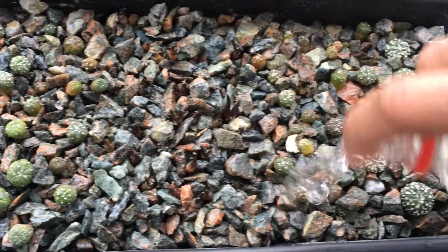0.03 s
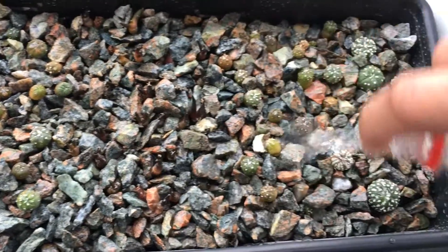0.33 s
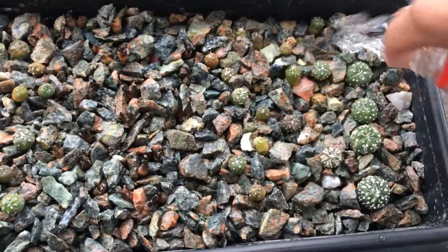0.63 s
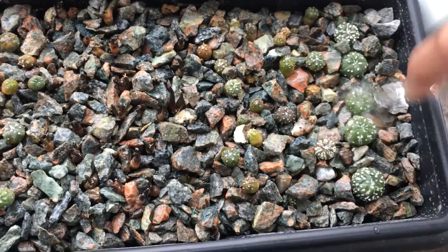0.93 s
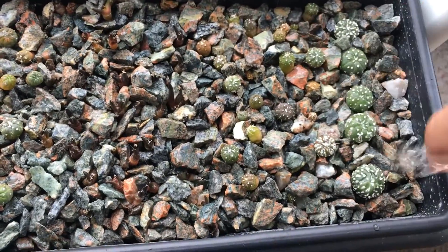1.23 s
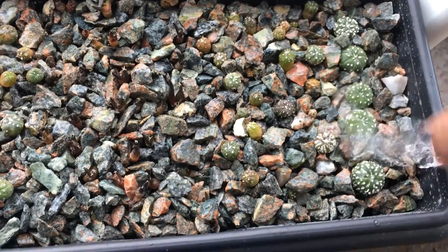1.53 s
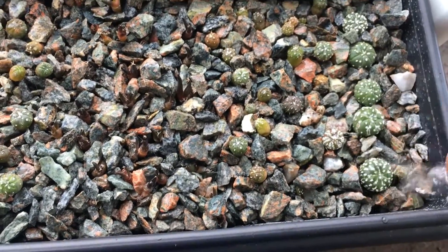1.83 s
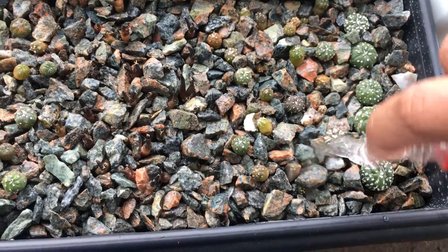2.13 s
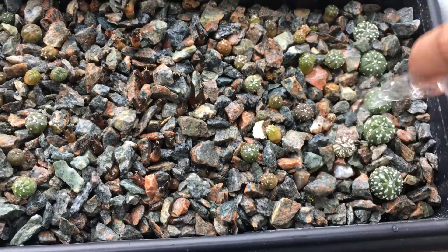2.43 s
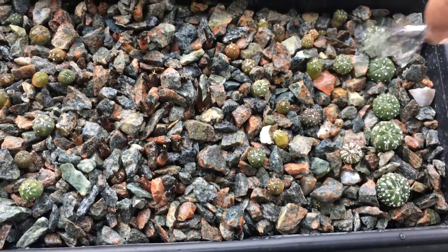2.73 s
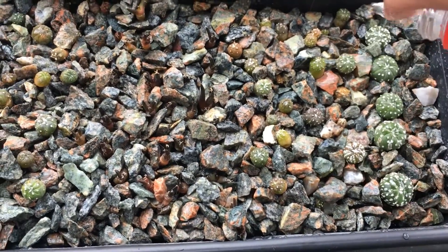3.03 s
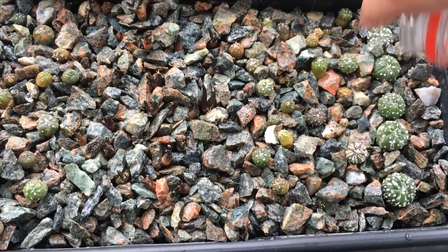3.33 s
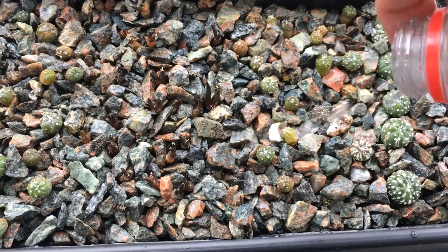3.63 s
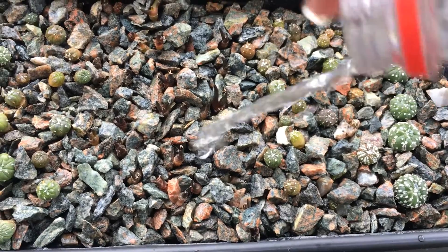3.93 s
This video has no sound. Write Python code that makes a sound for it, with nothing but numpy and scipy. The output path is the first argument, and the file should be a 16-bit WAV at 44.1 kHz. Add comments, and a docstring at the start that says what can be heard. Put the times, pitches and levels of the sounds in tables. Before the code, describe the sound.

Water sprinkles and ticks on small stones while a plastic bottle gulps softly.

```python
"""Water shaken from a plastic bottle onto gravel and small cacti in a tray; one close mic, a quiet room.
A first splash crackles over the room's low rumble, the bottle gulps, and a thin ring lingers.
For two seconds more the bottle thumps softly as air enters, while drops tick on the stones and splat
into wet gaps, trapped bubbles plink and fine patter follows the flow. Then the gulps stop and the
patter thins; drops keep falling, with a last small flurry just before the end."""
import sys
import numpy as np
from scipy import signal
from scipy.io import wavfile
from scipy.ndimage import uniform_filter1d

SR = 44100
rng = np.random.default_rng(int(sys.argv[2]) if len(sys.argv) > 2 else 0)


def store_wav(level_fs):
    """Save 16-bit WAV to argv[1]."""
    pcm = np.round(np.clip(np.atleast_2d(level_fs), -1, 1) * 32767)
    wavfile.write(sys.argv[1], SR, pcm.T.astype(np.int16))


N = 176400  # 4 s

# spectrum of water striking stone, for ticks and fizz (frequency [Hz], gain [dB])
IMPACT_SPECTRUM = [(300, 10), (900, -3.5), (2000, 4.5), (4000, 5), (8000, 5.5), (11000, 6), (16000, -1.5)]
CHIRP_PER_S = 20  # a drop's ring climbs by this many times its starting pitch per second


def amp(db):
    """Decibels to gain."""
    return 10 ** (np.asarray(db) / 20)


def unit(x):
    """Scales to rms 1."""
    return x / np.sqrt(np.mean(x ** 2) + 1e-20)


def seconds(size):
    """Time axis of size samples."""
    return np.arange(size) / SR


def read(points, hz):
    """Reads a curve on a log-frequency axis."""
    f, value = np.transpose(points)
    return np.interp(np.log(hz + 1), np.log(f), value)


def colour(x, spectrum):
    """Filters by a spectrum with minimum phase, so that clicks stay sharp."""
    log_gain = np.log(amp(read(spectrum, abs(np.fft.fftfreq(8192, 1 / SR)))))
    taps = np.fft.ifft(np.exp(np.conj(signal.hilbert(log_gain)))).real[:4096]
    return signal.fftconvolve(x, taps)[:len(x)]


def add(mix, s, sound):
    """Mixes a sound in at s seconds."""
    part = mix[max(round(s * SR), 0):][:len(sound)]
    part += sound[:len(part)]


def ring(t, hz, rise_s, decay_s):
    """A damped oscillation that follows a pitch."""
    envelope = (1 - np.exp(-t / rise_s)) * np.exp(-t / decay_s)
    return envelope * np.sin(2 * np.pi * np.cumsum(hz + 0 * t) / SR)


def splat(t, decay_s, rise_s=.0021):
    """One impact: a burst of noise that swells and dies within a few milliseconds."""
    return (1 - np.exp(-t / rise_s)) * np.exp(-t / decay_s) * rng.standard_normal(len(t))


def droplets(size, per_s, pitches, spread_db, cycles):
    """A random rain of tiny damped rings of uneven strength, rms 1."""
    t, out = seconds(size=400), np.zeros(size)
    for hz in pitches:
        lands = rng.random(size) < per_s / len(pitches) / SR
        strength = np.minimum(rng.exponential(1, size), 4)
        hits = lands * amp(spread_db * strength) * rng.choice([-1, 1], size)
        decay_s = cycles * 2 ** rng.uniform(-1, 1) / hz
        grain = ring(t, hz * (1 + CHIRP_PER_S * t), rise_s=.000079, decay_s=decay_s)
        out += signal.oaconvolve(hits, unit(grain))[:size]
    return unit(out)


def room_tone():
    """The quiet room: a steady low rumble and a faint, slightly flickering hiss."""
    # spectra of the room's rumble and hiss (frequency [Hz], relative level [dB])
    rumble_spectrum = [(10, -56), (25, -8), (38, -9.5), (56, 3.5), (80, 2), (115, -0.5), (160, -5),
                       (235, -20.5), (310, -17), (480, -31), (800, -33.5), (1500, -64)]
    hiss_spectrum = [(300, -4), (700, 17), (1100, 20.5), (2000, 8.5), (3500, -4), (5000, -24), (9000, -26),
                     (16000, -26)]
    rumble, hiss, drift = rng.standard_normal((3, N))
    rumble = amp(-43.5) * unit(colour(rumble, rumble_spectrum))
    hiss = amp(-66) * unit(colour(hiss, hiss_spectrum))
    flicker_db = 1.5 * unit(uniform_filter1d(drift, size=1500))
    return rumble + amp(flicker_db) * hiss


def tray_and_room(direct):
    """Adds quick echoes from the tray and a short room tail; both shift as the water moves about."""
    # reverberation of the room (frequency [Hz], time to fall 60 dB [s])
    room_t60 = [(100, 0.19), (1000, 0.18), (4000, 0.087), (16000, 0.019)]
    tray_db, room_db, tray_decay_s = -11, -15.5, .004
    t, out = seconds(size=16384), direct.copy()
    for k in range(3):  # three echo patterns, faded in and out in turn
        tray, room = rng.standard_normal((2, len(t)))
        tray *= (t > .001) * np.exp(-t / tray_decay_s)
        hz, when, bands = signal.stft(room * (t > .004), SR, nperseg=256)
        bands *= amp(-60 * when / read(room_t60, hz)[:, None])
        room = signal.istft(bands, SR, nperseg=256)[1][:len(t)]
        echo = amp(tray_db) * tray / np.linalg.norm(tray) + amp(room_db) * room / np.linalg.norm(room)
        share = np.sqrt(2 / 3) * np.cos(np.pi * (2 * seconds(N) + k / 3))
        out += signal.fftconvolve(direct * share, echo)[:N]
    return out


def fizz():
    """The tiniest droplets merge into a soft hiss."""
    # course of the wet hiss (time [s], level [dB])
    levels = [(0, -62), (.15, -68), (.9, -69), (2.35, -68), (2.8, -70), (3.62, -71), (3.66, -60),
              (3.75, -68), (3.87, -65), (4, -59)]
    bright = colour(rng.standard_normal(N), IMPACT_SPECTRUM)
    hiss = signal.lfilter(*signal.butter(2, 9500, fs=SR), bright)
    return amp(np.interp(seconds(N), *np.transpose(levels))) * unit(hiss)


def thin_ring():
    """Two faint high tones die away after the first splash."""
    t, out = seconds(size=SR), np.zeros(N)
    add(out, s=.055, sound=amp(-55) * ring(t, hz=2891, rise_s=.0045, decay_s=.15))
    add(out, s=.055, sound=amp(-63) * ring(t, hz=4560, rise_s=.0045, decay_s=.11))
    return out


def crackle():
    """Small drops slap the stones: dry ticks in narrow bands, each band with its own decay, rms 1."""
    # spectrum of the slaps (frequency [Hz], gain [dB])
    spectrum = [(600, 8), (1500, -8.5), (3400, 6.5), (4800, -1), (7000, 7.5), (10000, 4), (16000, 10)]
    per_s, spread_db = 340, 4.2
    t, out, centres = seconds(size=300), np.zeros(N), np.geomspace(1400, 13000, num=32)
    for hz in centres:
        lands = rng.random(N) < per_s / len(centres) / SR
        strength = np.minimum(rng.exponential(1, N), 3.5)
        hits = lands * amp(spread_db * strength)
        slap = splat(t, decay_s=.0006 * 2 ** rng.uniform(-1, 1), rise_s=.0006)
        band = signal.butter(2, [hz / 1.3, hz * 1.3], "bandpass", fs=SR)
        out += signal.oaconvolve(hits, unit(signal.lfilter(*band, slap)))[:N]
    return unit(colour(out, spectrum))


def patter():
    """Dry ticks and pitched drips come in clumps and follow the flow of water through the gravel."""
    # strength of the flow (time [s], level [dB])
    flow = [(0, -59.5), (.15, -65), (.32, -71), (.42, -59.5), (.78, -68.5), (.88, -56), (1.0, -65),
            (1.18, -65.5), (1.27, -59.5), (1.52, -63), (1.74, -56), (2.0, -61), (2.25, -58.5), (2.5, -59),
            (2.84, -70.5), (2.97, -65.5), (3.2, -73), (3.55, -77), (3.78, -60), (4, -79)]
    pitches = np.concatenate([np.geomspace(1250, 4400, 24), np.geomspace(4800, 9500, 6)])
    drips = droplets(N, per_s=200, pitches=pitches, spread_db=4, cycles=3.6)
    drift = uniform_filter1d(uniform_filter1d(rng.standard_normal(N), size=1300), size=500)
    clump_db = 4.5 * np.tanh(unit(drift))
    flow_db = np.interp(seconds(N), *np.transpose(flow))
    return amp(flow_db + clump_db) * (crackle() + amp(1) * drips)


def sprays():
    """A fan of fine droplets lands within a few hundredths of a second."""
    # flung spray (time [s], length [s], level [dB], centre pitch [Hz])
    fans = [(.002, 0.013, -42, 5050), (0.029, 0.019, -40.5, 5100), (0.375, 0.021, -47.5, 4050),
            (0.458, 0.022, -49, 4800), (0.801, 0.023, -45.5, 3640), (0.844, 0.064, -49.5, 5150),
            (1.727, 0.018, -48.5, 2560), (1.77, 0.041, -48, 1880), (2.243, 0.017, -74, 6600),
            (2.335, 0.027, -51, 6400), (3.536, 0.04, -55, 5870)]
    t, out = seconds(size=3000), np.zeros(N)
    for s, length, db, hz in fans:
        pitches = np.minimum(hz * np.geomspace(.35, 2.6, num=12), SR / 3)
        arch = np.sin(np.pi * np.minimum(t / length, 1)).clip(0) ** .5
        spray = droplets(len(t), per_s=7000, pitches=pitches, spread_db=5, cycles=2.6)
        add(out, s, amp(db) * arch * spray)
    return out


def gulps():
    """Air enters the shaken bottle: a soft thump that swells while its pitch drops to a low note."""
    # gulps of the bottle (time [s], level [dB], final pitch [Hz], decay [s])
    thumps = [(0.0654, -20.5, 111.6, 0.017), (.379, -19.5, 130, 0.0027), (0.732, -21, 162, 0.0038),
              (0.9342, -23, 117, 0.013), (1.3814, -22.5, 139, 0.019), (1.5912, -23.5, 141.3, .022),
              (1.7803, -18.5, 111, 0.0037), (2.053, -16, 119.4, 0.0054), (2.212, -29, 122, 0.021)]
    t, out = seconds(size=8000), np.zeros(N)
    glide = 1 + 1.6 * np.exp(-t / .0027)
    for s, db, hz, decay_s in thumps:
        add(out, s, -amp(db) * ring(t, hz * glide, rise_s=.0045, decay_s=decay_s))
    return out


def bubbles():
    """Trapped air rings for a few milliseconds, rising a little in pitch."""
    # bubbles (time [s], level [dB], starting pitch [Hz], decay [s])
    plinks = [(0.036, -33, 1600, 0.0016), (0.064, -39, 3300, 0.004), (.3916, -30.5, 1010, 0.0025),
              (0.485, -18.5, 3190, 0.00082), (0.7606, -18, 1990, 0.00067), (.9279, -21.5, 1310, 0.0018),
              (1.2865, -42.5, 1740, 0.0078), (1.312, -26, 1930, 0.00087), (1.343, -24.5, 908, 0.0027),
              (1.3428, -26.5, 1305, 0.0037), (1.735, -25, 7040, .0014), (1.7534, -18.5, 4620, 0.00095),
              (1.792, -32, 6940, 0.0031), (2.34, -33, 1780, 0.0025), (2.3794, -27, 1720, .0014),
              (2.48, -23, 2030, 0.00099), (2.6977, -20.5, 3630, 0.00072)]
    t, out = seconds(size=2000), np.zeros(N)
    glide = 1 + .026 * (1 - np.exp(-t / .048))
    for s, db, hz, decay_s in plinks:
        add(out, s, amp(db) * ring(t, hz * glide, rise_s=.00079, decay_s=decay_s))
    return out


def stone_ticks():
    """A drop on bare stone gives a bright, dry tick."""
    # drops on bare stone (time [s], level [dB])
    hits = [(0.0323, -22.5), (0.0507, -26), (0.2831, -36), (0.3666, -33), (0.4833, -27.5), (0.5604, -32),
            (0.622, -33), (0.6364, -42.5), (0.6739, -26.5), (1.253, -37), (1.4389, -32), (1.8382, -31),
            (2.1191, -32.5), (2.1408, -41), (2.163, -33), (2.1774, -35), (2.2094, -29.5), (2.2326, -26),
            (2.2734, -32), (2.3047, -34), (2.5541, -28), (2.5805, -43), (3.3368, -35.5), (3.357, -34),
            (3.6394, -33)]
    t, out = seconds(size=700), np.zeros(N)
    for s, db in hits:
        tick = colour(splat(t, decay_s=.0005), IMPACT_SPECTRUM)
        add(out, s, amp(db + 1) * tick / abs(tick).max())
    return out


def wet_drops():
    """A drop into a wet gap between stones gives a duller splat and a brief rising ring."""
    # drops into wet gaps (time [s], level [dB], pitch [Hz])
    hits = [(0.2034, -32, 4210), (0.2623, -33, 4590), (0.379, -37, 1310), (0.4688, -58, 2880),
            (0.7307, -37.5, 3350), (0.8174, -40, 1210), (0.8904, -29.5, 2730), (0.9184, -36.5, 1370),
            (1.2226, -28, 3230), (1.2521, -36, 1370), (1.3034, -34, 2100), (1.3813, -36, 3400),
            (1.4681, -32.5, 2200), (1.4774, -37, 2200), (1.5653, -36, 2700), (1.6387, -33.5, 3660),
            (1.6776, -30, 3170), (1.6914, -41.5, 2530), (1.7064, -34, 3900), (1.7779, -28, 2100),
            (1.9245, -33.5, 1750), (1.9364, -45, 1710), (1.9525, -36, 2560), (1.9994, -37.5, 3740),
            (2.0358, -34.5, 3430), (2.1806, -33, 3320), (2.2444, -35.5, 1240), (2.4663, -37.5, 2120),
            (2.5102, -41, 3800), (2.611, -40, 3640), (2.6708, -44.5, 3280), (2.7521, -39, 2310),
            (2.8888, -37, 3820), (2.9517, -34, 6240), (2.9744, -39, 2310), (3.0041, -33, 4670),
            (3.0215, -40.5, 1900), (3.26, -39, 3520), (3.3373, -33, 2300), (3.3543, -34.5, 3500),
            (3.463, -34.5, 3710), (3.6464, -28.5, 5770), (3.7574, -38.5, 2670), (3.7724, -41, 2500),
            (3.8097, -39.5, 3450)]
    splat_db, ring_db = -2, -3.5
    t, out = seconds(size=700), np.zeros(N)
    for s, db, hz in hits:
        band = signal.butter(2, [hz / 1.6, min(hz * 1.6, SR / 3)], "bandpass", fs=SR)
        wet = signal.lfilter(*band, splat(t, decay_s=.0008))
        tone = ring(t, hz * (1 + CHIRP_PER_S * t), rise_s=.00025, decay_s=.0015)
        add(out, s, amp(db) * (amp(splat_db) * wet / abs(wet).max() + amp(ring_db) * tone))
    return out


def scene():
    """At the mic, in mono: water landing in the tray close by, the bottle, and the room behind."""
    water = stone_ticks() + wet_drops() + bubbles() + sprays() + patter()
    return (tray_and_room(water) + gulps() + thin_ring() + fizz() + room_tone())[None]


def record(dry):
    """The recorder cuts the highest treble steeply."""
    lowpass = signal.firwin(255, cutoff=16200, window=("kaiser", 8), fs=SR)
    return signal.oaconvolve(dry, lowpass[None], "same")


dry = scene()
out = record(dry)
store_wav(out)
```